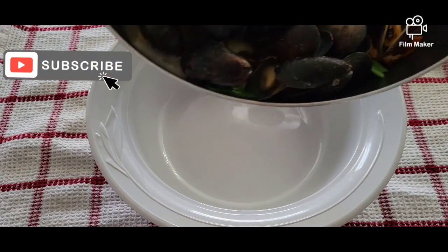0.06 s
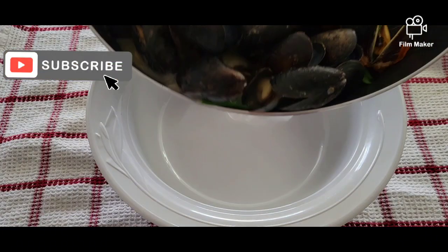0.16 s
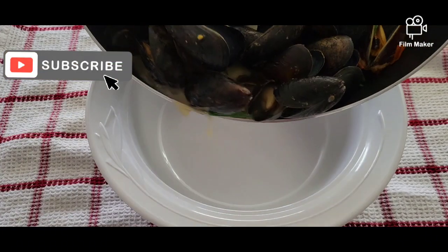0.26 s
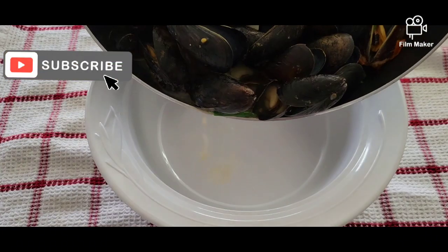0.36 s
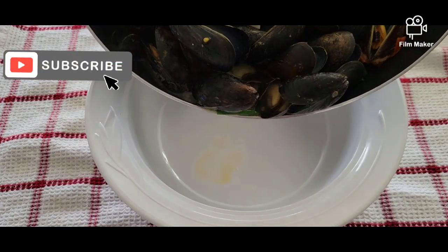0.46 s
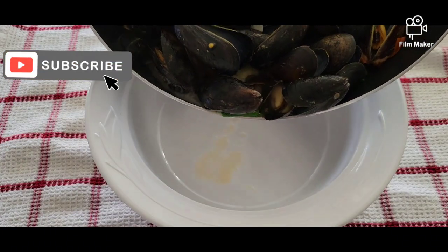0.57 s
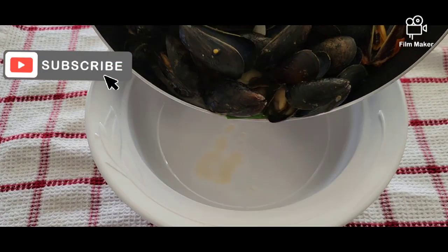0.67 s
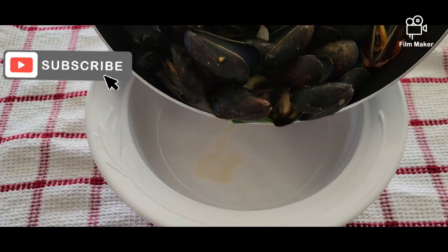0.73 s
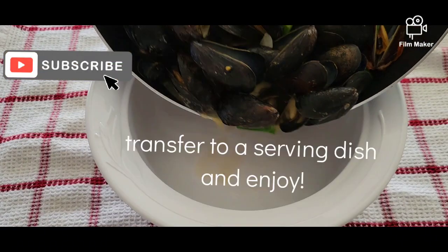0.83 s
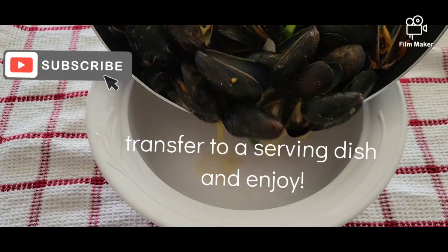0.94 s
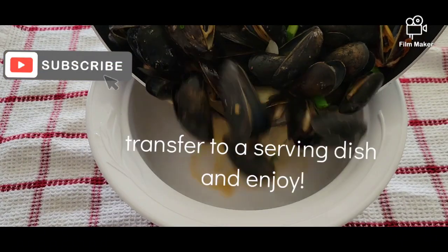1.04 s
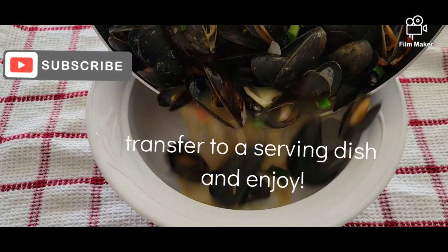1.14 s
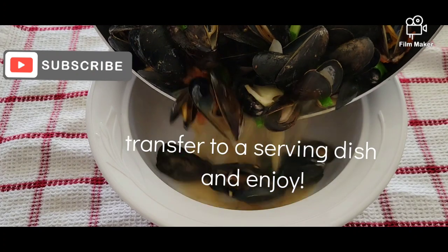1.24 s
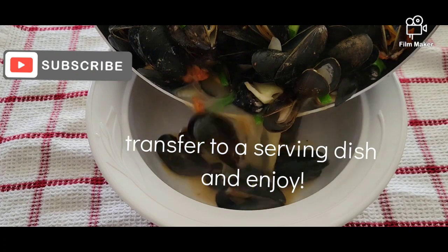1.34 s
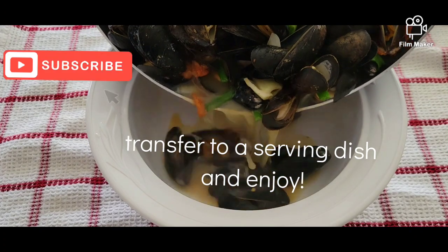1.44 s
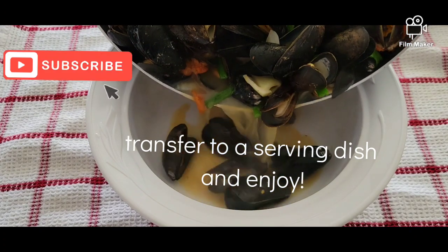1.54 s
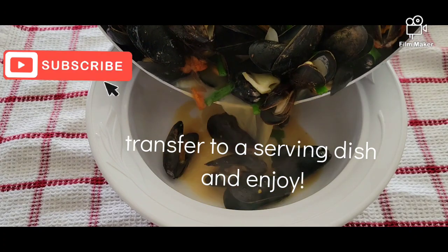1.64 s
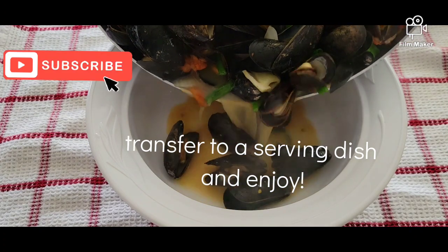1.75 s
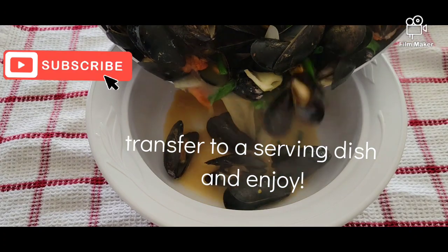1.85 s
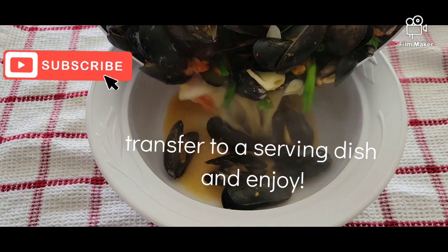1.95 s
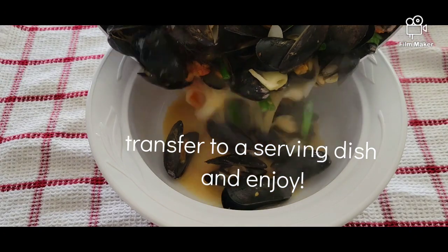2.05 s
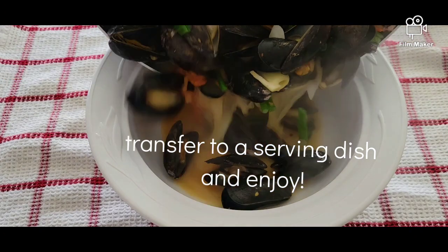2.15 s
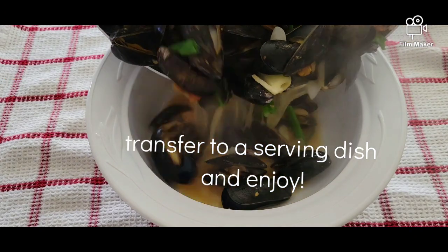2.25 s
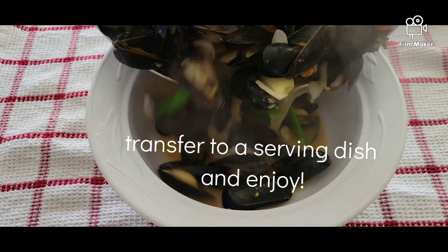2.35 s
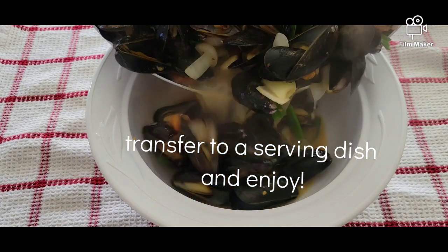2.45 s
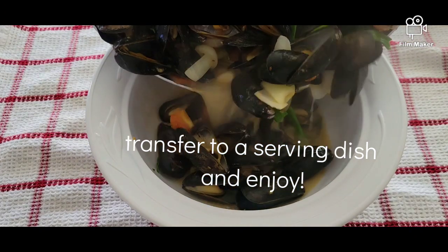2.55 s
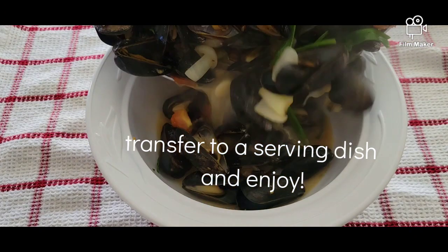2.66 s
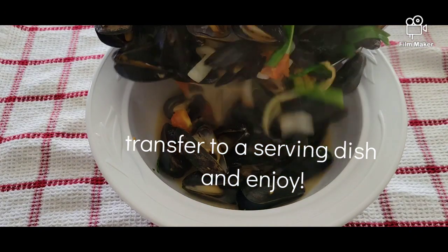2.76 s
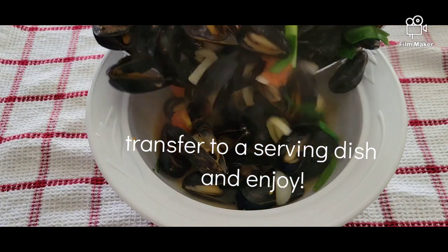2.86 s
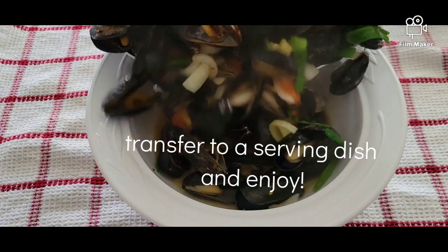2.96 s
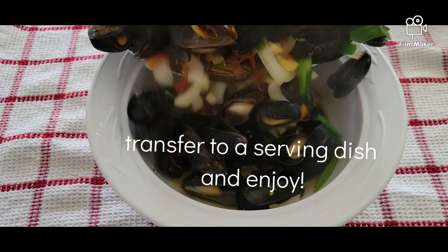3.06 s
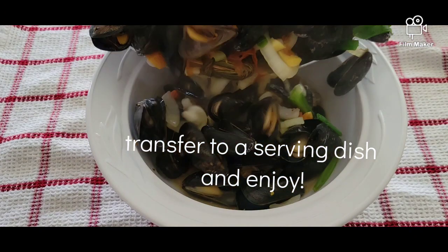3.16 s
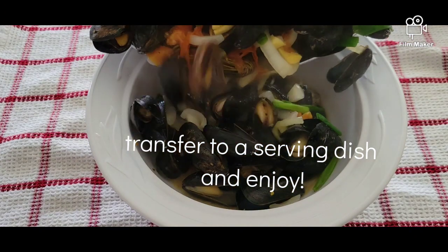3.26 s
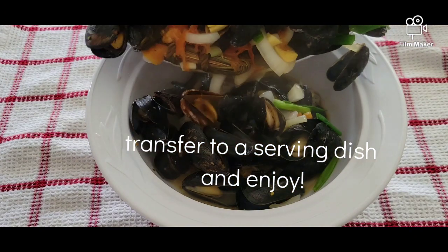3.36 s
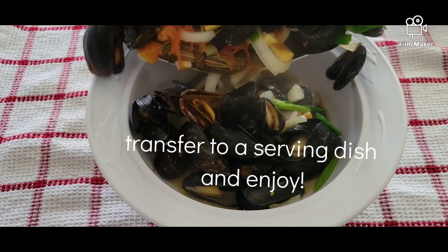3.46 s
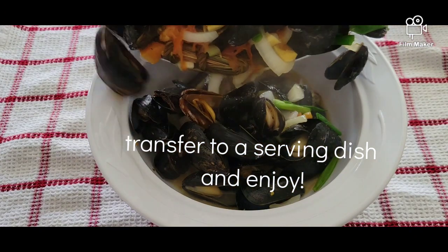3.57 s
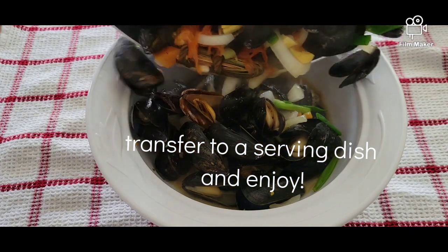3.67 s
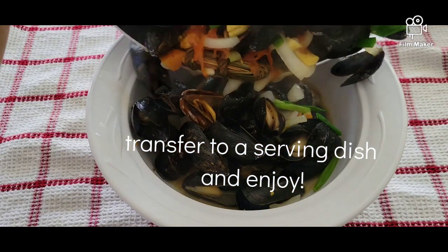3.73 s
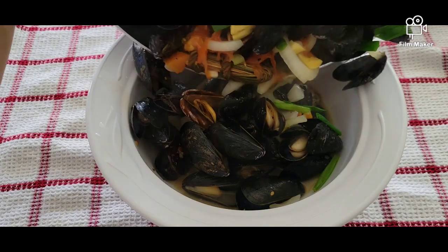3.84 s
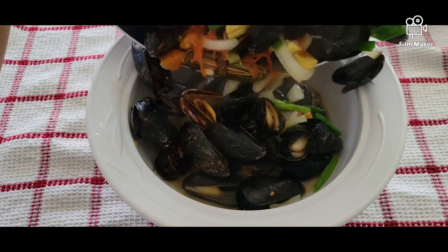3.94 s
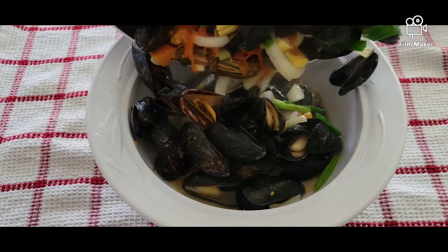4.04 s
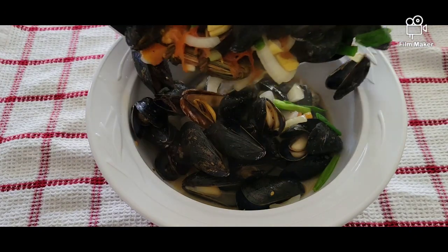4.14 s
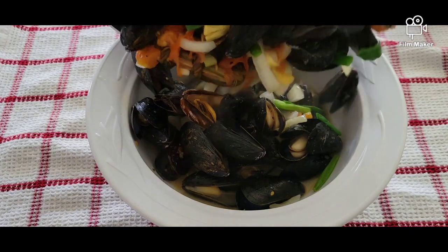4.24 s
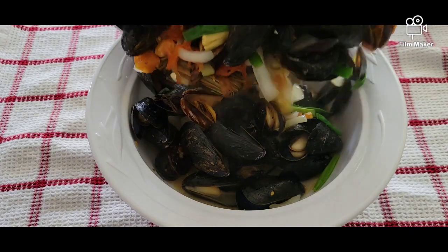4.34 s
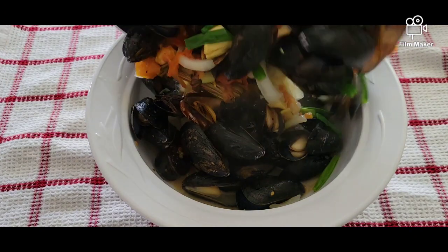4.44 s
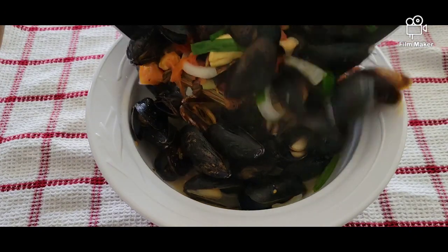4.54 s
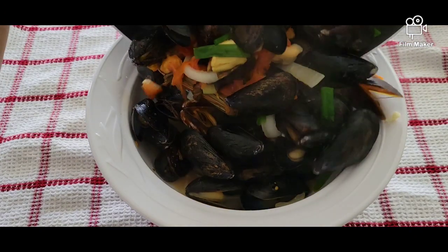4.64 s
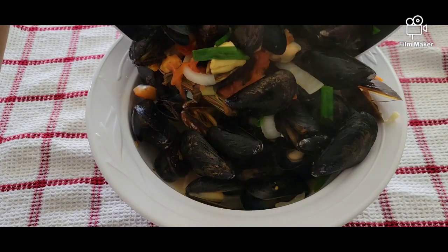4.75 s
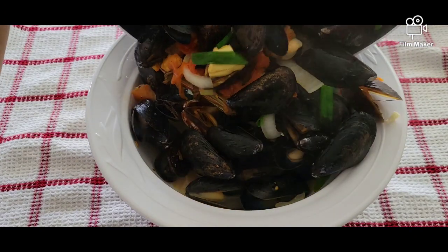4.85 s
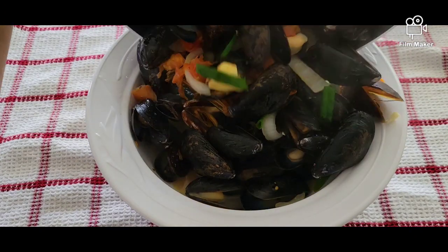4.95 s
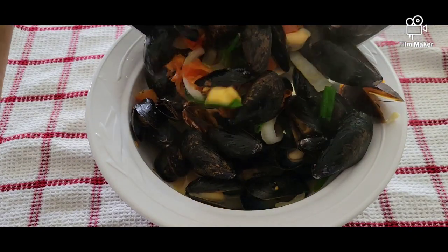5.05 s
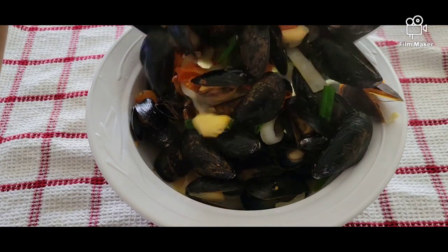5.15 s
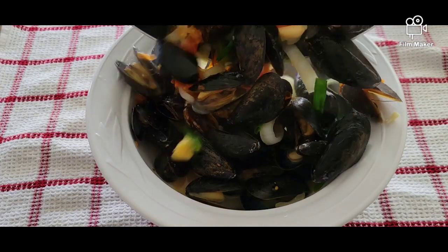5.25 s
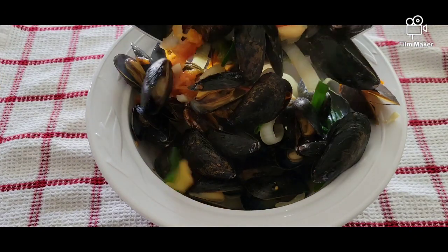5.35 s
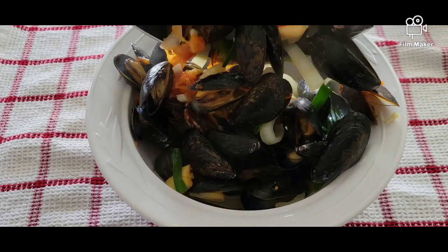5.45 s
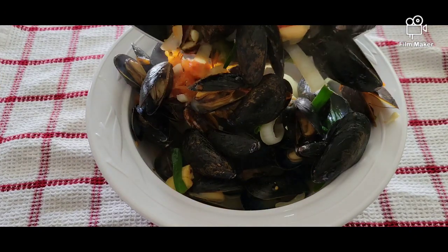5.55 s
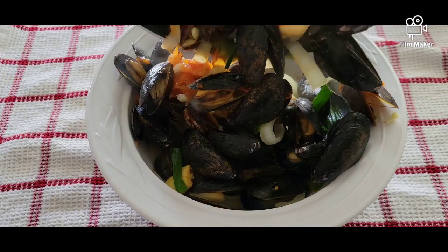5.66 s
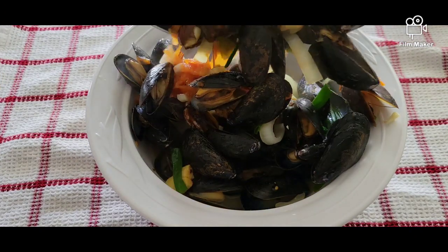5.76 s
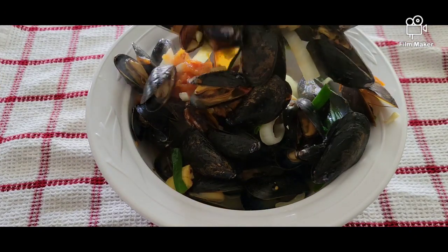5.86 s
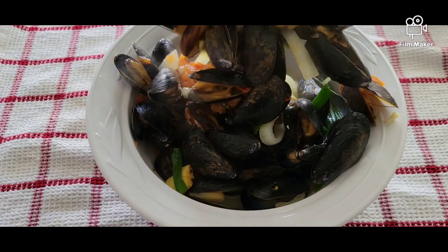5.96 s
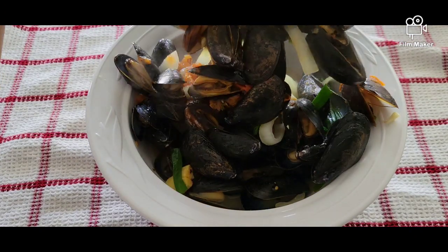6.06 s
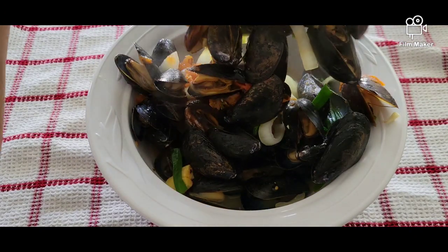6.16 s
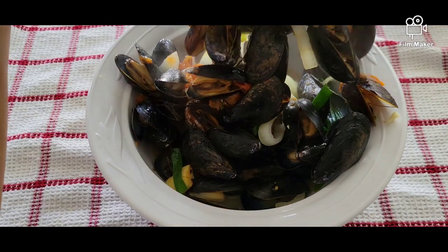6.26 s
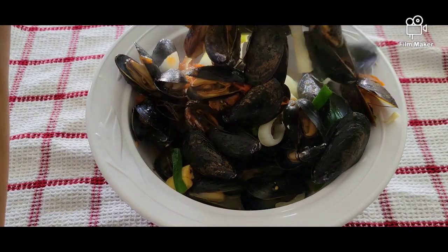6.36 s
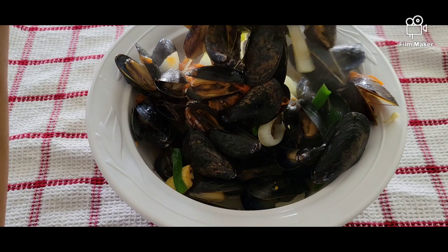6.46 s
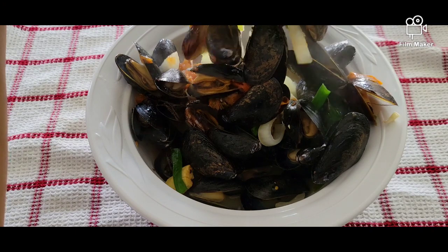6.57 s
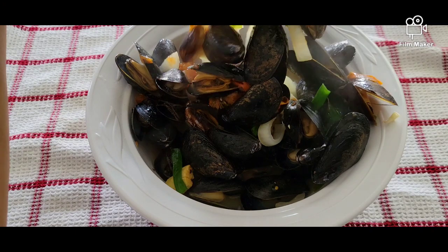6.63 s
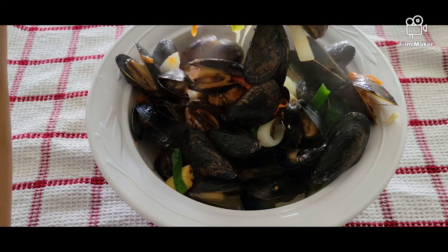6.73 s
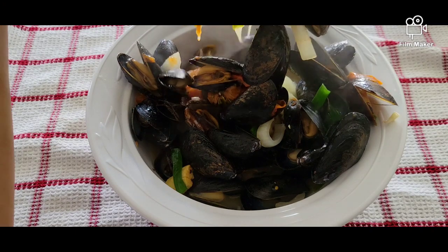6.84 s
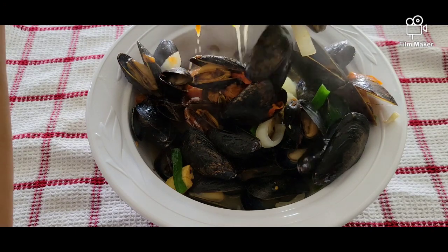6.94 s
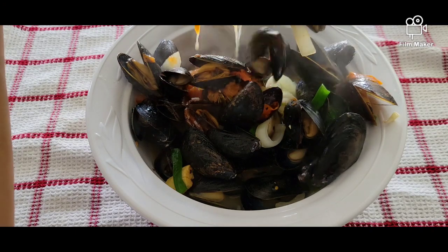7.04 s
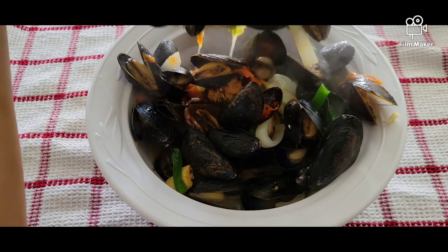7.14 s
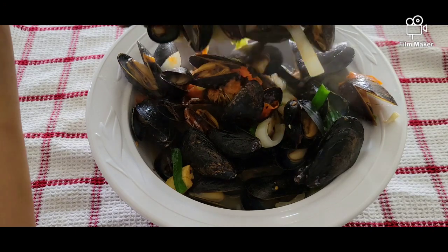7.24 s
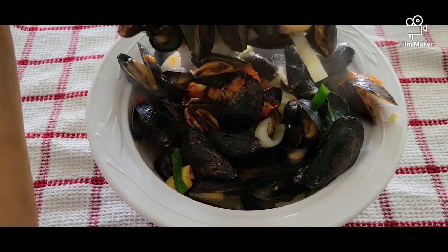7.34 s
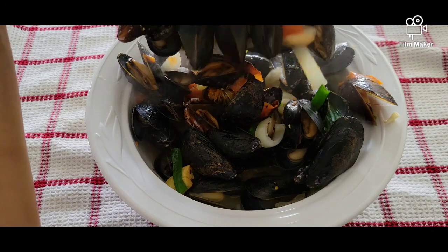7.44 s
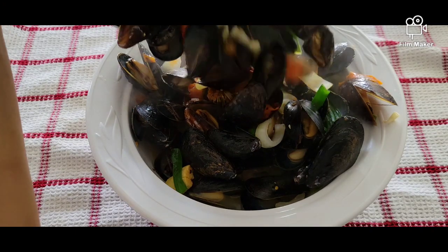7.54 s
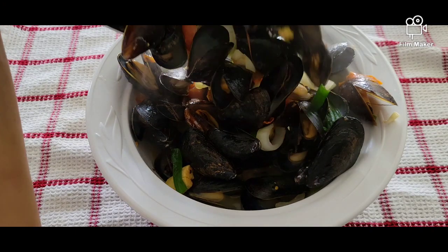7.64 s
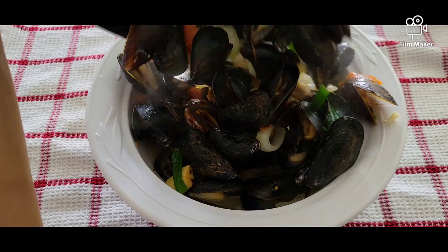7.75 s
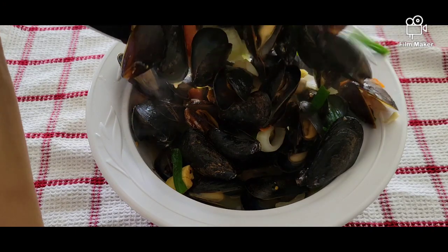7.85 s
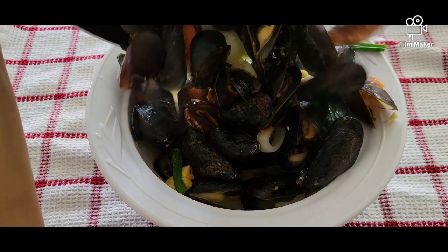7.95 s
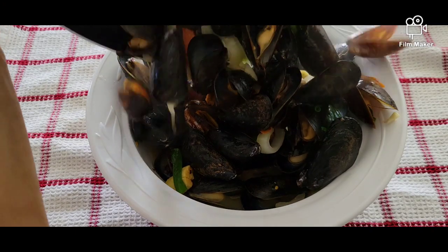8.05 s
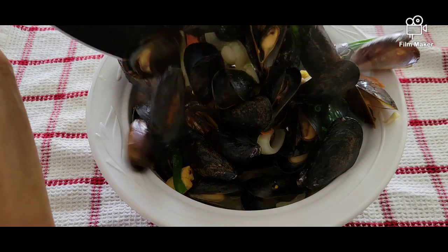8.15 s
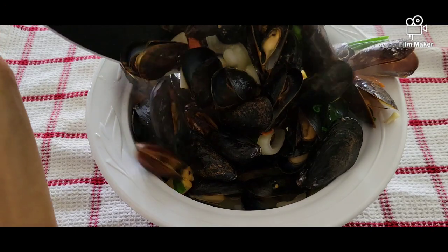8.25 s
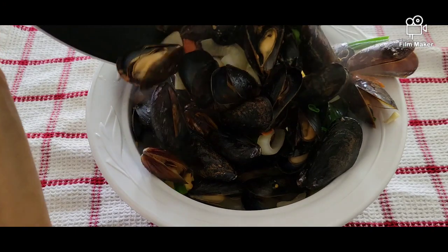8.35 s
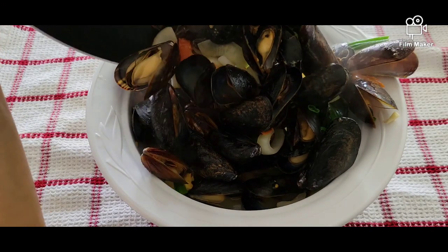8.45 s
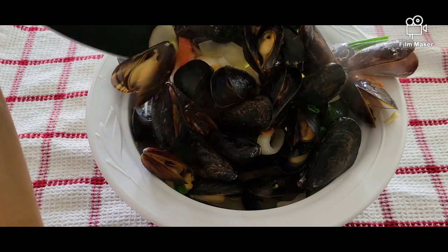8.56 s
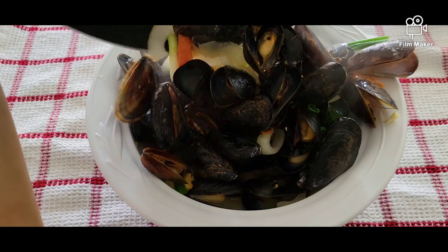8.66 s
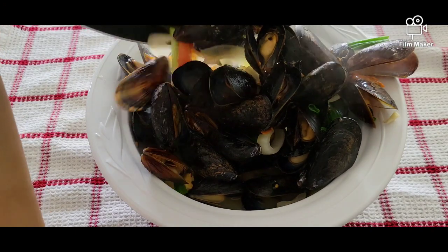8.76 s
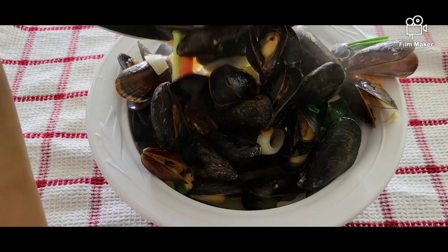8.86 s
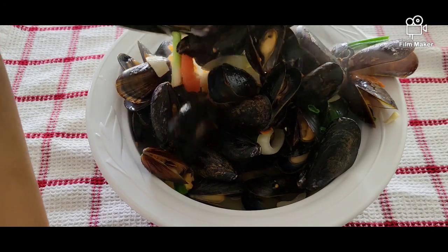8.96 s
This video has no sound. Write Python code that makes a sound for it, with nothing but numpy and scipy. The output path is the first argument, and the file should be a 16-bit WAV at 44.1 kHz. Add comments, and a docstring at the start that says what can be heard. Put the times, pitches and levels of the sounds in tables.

```python
"""A small, hard kitchen with an appliance humming; a phone's two microphone ports sit close to a ceramic bowl.
Just before one second, steamed mussels slide in from a pot, thud down and set the empty bowl ringing.
Shells clack on shells, tumble in quick streams and knock in the pot, busiest over the next two seconds.
Smaller batches follow until nine seconds, the bowl ringing shorter as it fills.
Between them the heap settles with faint ticks, plops of broth and a wet rustle."""
import sys
import numpy as np
from scipy import signal
from scipy.fft import rfft, irfft
from scipy.io import wavfile
from scipy.ndimage import uniform_filter1d

SR = 44100
rng = np.random.default_rng(int(sys.argv[2]) if len(sys.argv) > 2 else 0)


def transcribe(signal):
    """Save signal, clipped to [-1, 1], as a 16-bit WAV file at the path in sys.argv[1]."""
    frames = np.atleast_2d(signal).T
    limited = np.clip(frames, -1, 1)
    pcm = np.round(limited * 32767).astype(np.int16)
    wavfile.write(sys.argv[1], SR, pcm)


N = 9 * SR


def undb(db):
    return 10 ** (np.asarray(db) / 20)


def level(x, rms_db):
    return x * undb(rms_db) / np.sqrt(np.mean(x ** 2))


def band(x, lo_hz, hi_hz):
    """Butterworth band-pass."""
    sos = signal.butter(2, [lo_hz, min(hi_hz, .45 * SR)], "bandpass", fs=SR, output="sos")
    return signal.sosfilt(sos, x)


def fade(t, t60):
    """Exponential decay, 60 dB in t60 s."""
    return np.exp(-np.log(1000) * t / t60)


def mode(t, hz, t60):
    """A decaying sine."""
    return np.sin(2 * np.pi * hz * t) * fade(t, t60)


def place(out, start_s, sound, pan_db=0):
    """Set a sound before the phone; the nearer port hears it louder and a few samples earlier."""
    sound = np.atleast_2d(sound)
    for port, side in enumerate((1, -1)):
        start = int(np.clip(start_s * SR - side * np.clip(pan_db, -4, 4), 0, N - 1))
        piece = sound[port % len(sound), :N - start]
        out[port, start:start + len(piece)] += undb(side * pan_db / 2) * piece


# Spectrum of the kitchen's room tone: frequency_hz, relative_db
ROOM_TONE = [(25, -17), (200, -3.5), (300, -9.5), (550, -16.5), (1200, -30), (2500, -40), (16000, -56)]
# Tones of an appliance in the background: pitch_hz, level_db
APPLIANCE_HUM = [(201.3, -52.5), (161, -61.5), (60, -59.5)]
def kitchen():
    """Air noise, alike at both ports in the bass, and the wavering hum of an appliance."""
    bins_hz = np.fft.rfftfreq(N, 1 / SR) + 1
    tone_hz, tone_db = np.transpose(ROOM_TONE)
    spectrum = undb(np.interp(np.log(bins_hz), np.log(tone_hz), tone_db))
    mid, side = rfft(rng.standard_normal((2, N))) * spectrum
    side = side * np.clip(bins_hz / 1100, .16, 1)
    out = level(irfft(np.array([mid + side, mid - side]), N), rms_db=-56.5)
    for pitch_hz, level_db in APPLIANCE_HUM:
        mid, side = band(rng.standard_normal((2, N)), pitch_hz - 5, pitch_hz + 5)
        out += level(np.array([mid, mid - .3 * side]), level_db)
    return out


# Reverberation of the kitchen: frequency_hz, t60_s
ROOM_DECAY = [(4000, 0.43), (12000, 0.21)]
def room(near):
    """Hard walls return a short diffuse tail, less alike at the two ports in the higher octaves."""
    t, tail = np.arange(int(.7 * SR)) / SR, 0
    decay_hz, t60_s = np.transpose(ROOM_DECAY)
    common, own = rng.standard_normal(len(t)), rng.standard_normal((2, len(t)))
    for octave_hz in 125 * 2. ** np.arange(8):
        alike = np.clip(500 / octave_hz, .2, 1)
        noise = alike * common + np.sqrt(1 - alike ** 2) * own
        octave = band(noise, octave_hz / np.sqrt(2), octave_hz * np.sqrt(2))
        tail = tail + octave * fade(t, np.interp(np.log(octave_hz), np.log(decay_hz), t60_s))
    tail *= np.minimum(t / .00029, 1)
    tail = undb(-5.5) * tail / np.sqrt(np.sum(tail ** 2) / 2)
    return signal.fftconvolve(near.mean(0)[None], tail, axes=1)[:, :N]


def clack(pitch_hz, crack_db, t60=.02, contact_s=.0009, samples=1500):
    """One curved shell: a hollow ring, quicker rings of jostled neighbours, a knock and a brief crack."""
    t, hiss = np.arange(samples) / SR, rng.standard_normal(samples)
    crack_db = min(crack_db, 2)
    ring = mode(t, pitch_hz, t60)
    for _ in range(3):
        neighbour_hz = pitch_hz * 2 ** rng.normal(-.2, .4)
        ring += undb(rng.normal(-8, 2)) * mode(t, neighbour_hz, .6 * t60)
    knock = band(hiss * fade(t, .026), .6 * pitch_hz, 1.9 * pitch_hz)
    body = ring + undb(7 + .3 * crack_db) * knock  # a harder contact knocks more
    body *= np.minimum(t / contact_s, 1)
    body += undb(-3.5) * band(hiss * fade(t, .0099), 700, 1600)  # the hollow heap underneath
    crack = band(hiss * fade(t, .01), 2800, 13000)
    return body / np.abs(body).max() + undb(crack_db) * crack / np.abs(crack).max()


# Loudness of the sliding heap and broth, close to the phone: time_s, level_db
HEAP_SLIDE = [(0, -75), (.2, -63), (.3, -117), (.6, -82), (1.301, -41), (1.748, -64.5), (2.901, -48.5),
              (3.6, -56), (4.1, -76.5), (4.502, -50), (5.03, -66.5), (5.699, -74), (6.399, -52),
              (7.198, -69.5), (7.802, -51.5), (8.751, -64.5), (9, -67.5)]
def heap(grains=420):
    """Faint ticks of settling shells and plops of broth over a patchy wet rustle."""
    out, t = np.zeros((2, N)), np.arange(900) / SR
    slide_s, slide_db = np.transpose(HEAP_SLIDE)
    for start_s in rng.uniform(0, N / SR, grains):
        pitch, hardness = rng.standard_normal(2)
        if hardness < 0:  # a bubble of broth pops, rising in pitch
            grain = np.sin(2 * np.pi * 1100 * 2 ** (.3 * pitch) * t * (1 + 10 * t)) * fade(t, .03)
        else:
            tick_hz = 1900 * 2 ** (.5 * pitch)
            grain = clack(tick_hz, -22 + 5 * hardness, t60=.008, contact_s=.003, samples=len(t))
        grain_db = np.interp(start_s, slide_s, slide_db) + 13.5 + 4 * min(rng.exponential(), 3)
        place(out, start_s, undb(grain_db) * grain, pan_db=rng.normal(0, 2))
    patches = uniform_filter1d(rng.standard_normal(N), 1500)
    rustle = band(rng.standard_normal((2, N)), 900, 5500) * undb(5 * patches / patches.std())
    rumble = band(rng.standard_normal(N), 22, 140)  # the table shakes under the shifting weight
    slide = undb(np.interp(np.arange(N) / SR, slide_s, slide_db))
    return out + (level(rustle, 0) + level(rumble, 2.3)) * slide


# Soft, heavy landings in the bowl: start_s, peak_db, pitch_hz
LANDINGS = [(0.885, -8, 528.5), (0.964, -19, 490), (1.344, -20.5, 504), (2.842, -20, 413),
            (4.522, -30.5, 194), (6.288, -30.5, 200), (7.823, -32, 165)]
def thuds():
    """A soft push rings the hollow under the heap."""
    out, t = np.zeros((2, N)), np.arange(SR // 5) / SR
    for start_s, peak_db, pitch_hz in LANDINGS:
        push = band(rng.standard_normal(len(t)) * fade(t, .1), .4 * pitch_hz, 2.4 * pitch_hz)
        hollow = mode(t, pitch_hz, t60=.045) + 1.6 * push
        place(out, start_s, undb(peak_db) * hollow / np.abs(hollow).max())
    return out


# Shells knocking inside the pot, centred between the ports: start_s, level_db, pitch_hz, crack_relative_db
POT_KNOCKS = [(1.5291, -6, 1780, -13.5), (3.6252, -0.5, 2510, -43), (5.298, -9, 2465, -10),
              (5.931, -19, 2380, -36)]
def pot():
    """A hollow knock that the pot's walls hold as a narrow, grainy ring."""
    out, t = np.zeros((2, N)), np.arange(SR // 2) / SR
    for start_s, level_db, pitch_hz, crack_db in POT_KNOCKS:
        knock = clack(pitch_hz, crack_db, contact_s=.001, samples=len(t))
        walls = band(rng.standard_normal((2, len(t))), .93 * pitch_hz, 1.07 * pitch_hz)
        held = level(walls, -26) * fade(t, .45)
        place(out, start_s, undb(level_db) * (knock + held))
    return out


FILL_S = 2.2  # time constant of the bowl's damping as it fills
# Modes of the ceramic bowl; a slightly uneven rim splits the second in two: pitch_hz
BOWL_MODES_HZ = [770, 2146, 2125, 3861, 5084, 5436, 6120, 6646, 7998, 8640, 10859]
# Strength of the same modes: relative_db
BOWL_MODES_DB = [0, -3, -12, -15, -17, -18, -13, -18, -19, -19, -25]
# Shells hitting the ceramic, close to the phone: start_s, level_db, upper_relative_db, lowest_relative_db
BOWL_STRIKES = [(0.8854, -32, -8, -0.5), (1.1014, -17.5, 11.5, -13), (1.1832, -5, -1, -22),
                (2.1904, -16.5, -3, -16), (2.2845, -11.5, 1, -20), (2.4039, -10.5, 5, -24),
                (2.6808, -13.5, -9.5, -11), (2.9644, -9.5, 4.5, -17.5), (3.47, -21, -20.5, -7),
                (3.6252, -15, -9.5, -18), (3.7224, -18.5, -28, -19.5), (4.3485, -18.5, -3, -12),
                (4.604, -17.5, 9.5, -20), (5.253, -21.5, -3.5, -11), (6.2555, -17.5, 11.5, -16),
                (6.8175, -22, -8, -25), (6.96, -29, 5.5, -7.5), (8.1519, -16, 4, -35)]
def bowl():
    """Each strike rings the modes, which reach each port at their own phase; resting shells damp them."""
    out, t = np.zeros((2, N)), np.arange(int(.8 * SR)) / SR
    faint_hz = rng.uniform(2300, 9000, (40, 1))  # many faint modes crowd into a short shimmer
    for start_s, level_db, upper_db, lowest_db in BOWL_STRIKES:
        free = .22 + .68 * np.exp(-start_s / FILL_S)  # share of the ring time that the heap leaves
        phases = rng.uniform(0, 2 * np.pi, (2, len(faint_hz), 1))
        shimmer = np.sin(2 * np.pi * faint_hz * t + phases).sum(1) * fade(t, .3)
        table_thump = mode(t, 165, t60=.05)
        ring = undb(upper_db - 30) * shimmer + undb(lowest_db + .5) * table_thump
        for k, (pitch_hz, mode_db) in enumerate(zip(BOWL_MODES_HZ, BOWL_MODES_DB)):
            if k == 0:  # the lowest mode rings longest
                blow_db, sustain, mute, settle_s = lowest_db, 1.8 * free, .65 * (1 - free), .11
            elif k < 3:  # the split pair
                blow_db, sustain, mute, settle_s = 0, free, .65, .055
            else:  # the upper modes stay clear of the heap
                blow_db, sustain, mute, settle_s = rng.normal(upper_db, 3.5), .65, .65, .055
            t60 = .75 * sustain * (pitch_hz / 1000) ** -.3  # higher modes die sooner
            resting = np.clip(2 * t / settle_s - 1, 0, 1)  # the shell comes to rest on the glaze
            envelope = fade(t, t60) * (1 - mute * resting)
            port_phase = min(pitch_hz / 2600, 1.2) * rng.normal(1, .52) * np.array([[1], [-1]])
            ring += undb(mode_db + blow_db) * np.sin(2 * np.pi * pitch_hz * t + port_phase) * envelope
        place(out, start_s, undb(level_db) * ring * np.minimum(t / .001, 1))
    return out


def bowl_hum(clatter):
    """Every clack on the heap nudges the bowl's lowest mode, less so as the bowl fills."""
    nudges = clatter.mean(0) * np.exp(-np.arange(N) / SR / FILL_S)
    resonance = signal.iirpeak(BOWL_MODES_HZ[0], Q=300, fs=SR)
    return undb(21) * signal.lfilter(*resonance, nudges)


# Quick streams of shells into the bowl: start_s, length_s, level_db, crack_relative_db, gap_s
SHELL_STREAMS = [(1.208, 0.06, -6, 2, 0.029), (1.908, .085, -22.5, -13.5, 0.0069),
                 (2.741, 0.06, -13.5, -17, 0.011), (4.287, 0.065, -33.5, -11.5, 0.012),
                 (5.677, .05, -39.5, -1, 0.0042)]
def tumbling_shells(most_shells=14):
    """Shells tumble at nearly even gaps, each with its own pitch and weight."""
    out = np.zeros((2, N))
    for start_s, length_s, level_db, crack_db, gap_s in SHELL_STREAMS:
        delays_s = gap_s * (np.cumsum(2 ** rng.normal(0, .5, most_shells)) - 1)
        for delay_s in delays_s[delays_s < length_s]:
            shell = undb(rng.normal(level_db, 5.46)) * clack(2700 * 2 ** rng.normal(0, .35), crack_db)
            place(out, start_s + delay_s, shell, pan_db=rng.normal(0, 2.2))
    return out


# Shell on shell, right in front of the phone: start_s, level_db, pitch_hz, crack_relative_db
SHELL_CLACKS = [(0.64, -41.5, 1530, -30), (0.882, -13.5, 2150, -44), (1.101, 3.5, 3500, 12.5),
                (1.1529, 4.5, 3240, 2.5), (1.29, -9.5, 4450, 4), (1.354, -8.5, 1850, -7),
                (1.4634, -13, 2910, -26), (1.505, -14, 3020, -52), (2.0167, -18, 3960, 7.5),
                (2.046, -18, 3190, -3), (2.1905, -6, 2270, -2.5), (2.209, 1, 3350, -15.5),
                (2.274, 0, 3350, -25), (2.382, -7, 3180, -77), (2.4022, -2, 1990, 16.5),
                (2.474, -6, 3630, 7), (2.7122, -10.5, 2140, -5), (2.804, -3, 2210, -10.5),
                (2.8944, -15, 2800, -3), (2.916, -7, 2890, -7), (2.9651, -11, 2130, -18),
                (3.033, -9, 2100, -12), (3.0843, -8, 1960, -11.5), (3.1747, -14, 2740, -13),
                (3.266, -9, 2320, -6.5), (3.31, -12.5, 1970, -18), (4.3477, -8.5, 3620, -36),
                (4.485, -21, 5330, -24), (4.546, -11.5, 1850, -15), (4.5641, -6.5, 3850, -10),
                (4.602, -4.5, 4060, -36), (5.1615, -11, 3226, -45), (5.254, -14.5, 2900, 2.5),
                (5.622, -30, 3180, -16), (6.168, -25, 1100, -2), (6.2554, -3.5, 2910, 5),
                (6.343, -10, 3300, -26), (6.38, -11.5, 2950, -24), (6.693, -14, 4170, -15),
                (6.718, -19.5, 2580, -55.5), (6.794, -19, 3100, -16), (6.8185, -6.5, 4110, -28),
                (6.961, -3.5, 2320, 12), (7.0074, -26, 1800, -5), (7.0184, -19, 1780, -25),
                (7.1451, -29.5, 1750, -22), (7.3092, -31, 1780, -12), (7.3592, -19, 1700, -14),
                (7.5372, -9, 3330, -21), (7.762, -20, 1535, -24), (7.8293, -16.5, 1855, -3.5),
                (8.0399, -9.5, 2980, -20), (8.089, -7, 3270, -18), (8.1516, -2.5, 2610, 6.5),
                (8.6493, -29, 1470, 0), (8.875, -25.5, 3140, -25), (8.983, -14.5, 3060, -9.5)]
def clacking_shells(bounces=3):
    """A shell lands on others with a clear clack and rattles on in a few weaker bounces."""
    out = np.zeros((2, N))
    for start_s, level_db, pitch_hz, crack_db in SHELL_CLACKS:
        pan_db = rng.normal(0, 2.5)
        place(out, start_s, undb(level_db) * clack(pitch_hz, crack_db), pan_db)
        delays_s = np.cumsum(.0028 + rng.exponential(.013, bounces))
        for k, delay_s in enumerate(delays_s, start=1):
            bounce = clack(pitch_hz * 2 ** rng.normal(0, .3), crack_db, t60=.014)
            bounce_db = rng.normal(level_db - 12 - 3.5 * k, 3)
            place(out, start_s + delay_s, undb(bounce_db) * bounce, pan_db)
    return out


def scene():
    """Mussels, pot and bowl close up, with the kitchen behind them."""
    clatter = clacking_shells() + tumbling_shells()
    near = heap() + thuds() + pot() + bowl() + bowl_hum(clatter) + clatter
    return kitchen() + room(near) + near


def record(dry):
    """The phone's microphones drop the deepest bass, round the loudest peaks and cut the top."""
    low_cut = signal.butter(2, 45, "highpass", fs=SR, output="sos")
    top_cut = signal.ellip(10, .2, 95, 16700, fs=SR, output="sos")
    rounded = .85 * np.tanh(signal.sosfilt(low_cut, dry) / .85)
    return signal.sosfilt(top_cut, rounded)


dry = scene()
out = record(dry)
transcribe(out)
```